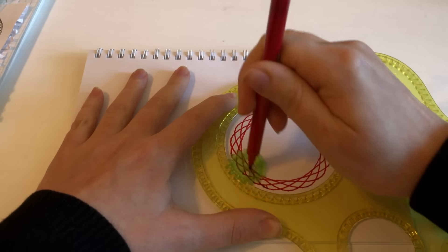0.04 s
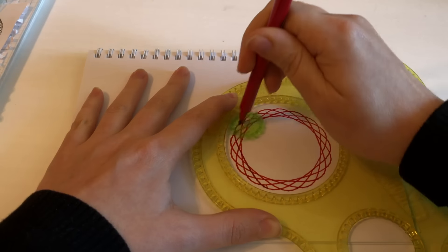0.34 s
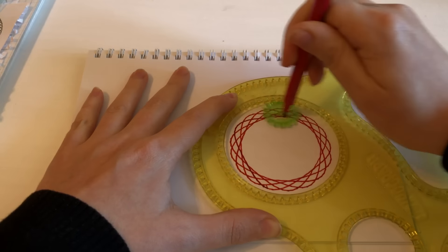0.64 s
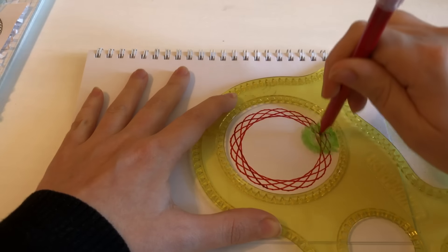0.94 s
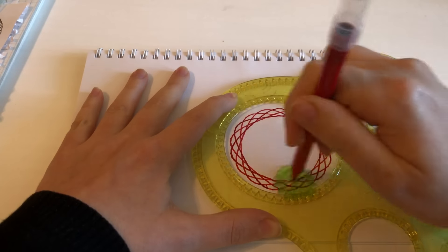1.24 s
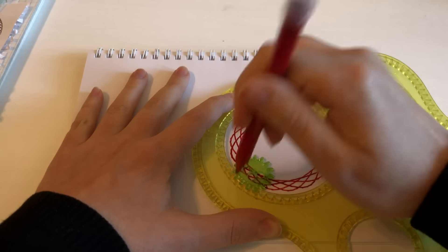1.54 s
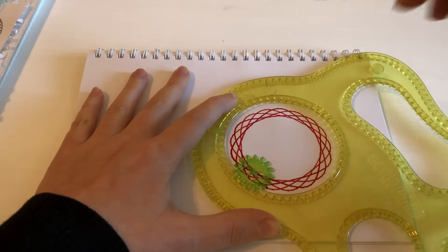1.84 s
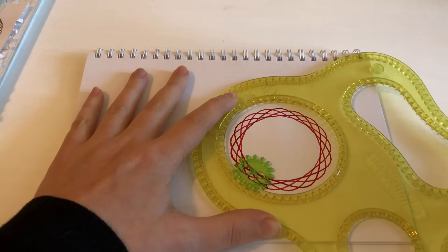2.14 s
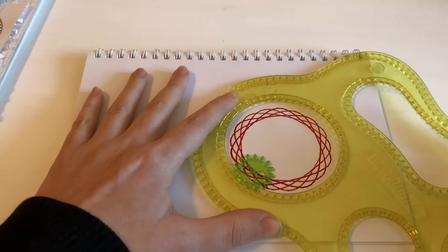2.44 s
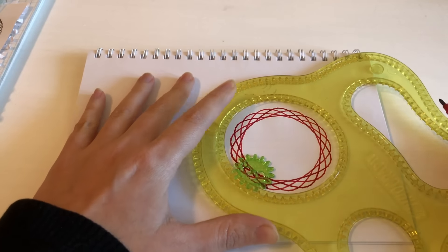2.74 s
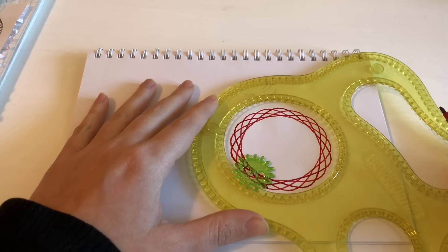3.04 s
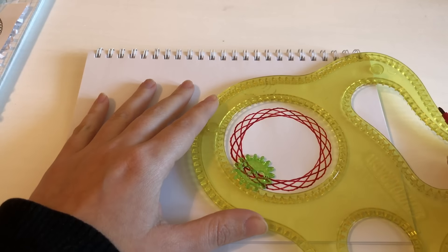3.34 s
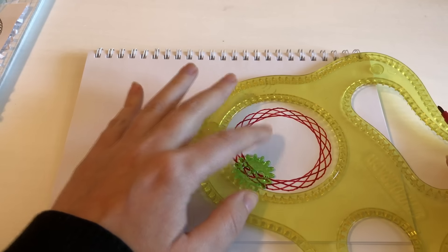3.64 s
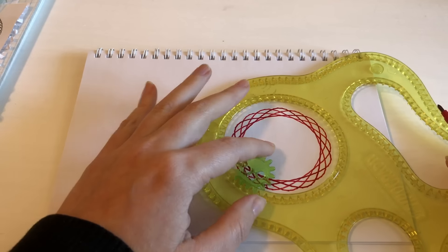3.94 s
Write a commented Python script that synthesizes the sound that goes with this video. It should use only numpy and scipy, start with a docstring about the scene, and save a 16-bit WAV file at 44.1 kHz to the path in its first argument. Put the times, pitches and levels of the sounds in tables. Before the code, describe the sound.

A pen drives a small plastic gear around a toothed template, scratching and rattling, then stops.

```python
"""A desk in a small quiet room, one microphone close to a toothed template on a paper pad.
From the start a pen drives a small plastic gear round inside it: the nib scratches harder until each
tooth drops home with a knock, and at times stalls. At 1.2 s a tooth jumps with a sharp, bright crack, and
at 1.6 s the pen rattles out. A hand rubs over the template and nudges the gear: a snap at 2.6 s, a
fingertip squeak just after, and a few light ticks near the end, over faint room tone."""
import sys
import numpy as np
from scipy import signal
from scipy.fft import rfft, irfft
from scipy.io import wavfile
from scipy.ndimage import uniform_filter1d

SR = 44100
rng = np.random.default_rng(int(sys.argv[2]) if len(sys.argv) > 2 else 0)


def dump(signal):
    """Clip the signal to [-1, 1] and save it as 16-bit WAV at the path in sys.argv[1]."""
    limited = np.clip(np.atleast_2d(signal).T, -1, 1)
    pcm = np.round(limited * 32767).astype(np.int16)
    wavfile.write(sys.argv[1], SR, pcm)


N = 176400

# room tone at the microphone: (frequency [Hz], spectral level [dB])
ROOM_SPECTRUM = [(25, -10), (60, 6), (100, -4), (200, -1.5), (600, -13), (2000, -20.5), (4000, -29.5),
                 (15000, -25.5)]
# reflections off desk and walls: (frequency [Hz], gain [dB])
ECHO_SPECTRUM = [(300, -1), (2000, 1.5), (12000, -17.5)]
# hand and sleeve rubbing: (time [s], level [dB])
RUB_LEVELS = [(1.65, -67), (2.0, -64), (2.22, -60), (2.66, -56), (2.83, -59), (3.15, -68), (3.48, -70.5),
              (3.53, -61.5), (3.59, -68), (3.73, -56.5), (3.8, -69), (4.0, -68.5)]
# colour of the rubbing: (frequency [Hz], spectral level [dB])
RUB_SPECTRUM = [(150, 2), (500, -8.5), (900, -1.5), (1600, -1.5), (2700, -3), (4000, -4.5), (6000, -9),
                (9000, -13.5), (16000, -21)]
# pen and fingers thud on the pad: (time [s], level [dB], pitch [Hz], decay [s])
THUDS = [(1.611, -47, 900, 0.018), (2.596, -48.5, 380, 0.016), (3.763, -45.5, 69, 0.039)]
# colour of thuds and desk rumble: (frequency [multiple of the pitch], spectral level [dB])
THUD_SPECTRUM = [(.3, -11.5), (1, 3), (3.5, -38.5)]
# plastic squeaking under a fingertip: (frequency [Hz], level [dB])
SQUEAK_MODES = [(1700, -57.5), (5320, -56.5)]
# template and gear pressed on the pad: (frequency [Hz], gain [dB], time to fall 60 dB [s])
PRESSED_MODES = [(762, 2.5, 0.03), (897, 4.5, 0.021), (1108, 4.5, 0.016), (1655, 2, 0.014),
                 (1902, 0, 0.014), (2537, 1.5, 0.011), (3160, 1, 0.011), (3880, 9.5, 0.0051),
                 (4650, -5, 0.014), (5500, 1, 0.011), (6060, -2.5, 0.011), (7120, -1, 0.0049)]
# the gear lying loose: (frequency [Hz], gain [dB], time to fall 60 dB [s])
LOOSE_MODES = [(815, 12, 0.026), (1720, -3, 0.037), (2590, -6.5, 0.017), (3630, -7, 0.02), (4170, 0, 0.017),
               (5330, -16.5, 0.029), (6100, -1, 0.013), (8300, -5, 0.0082)]
# nib on paper: (frequency [Hz], spectral level [dB])
NIB_SPECTRUM = [(400, -14), (1000, -7), (1600, -0.5), (2200, -11), (3800, -1.5), (4800, -3.5), (5450, 0),
                (6500, -4), (9300, -1), (10400, -4.5), (11400, -0.5), (15500, -2)]
# the nib's colour as the stroke turns: (time [s], then a gain [dB] for each of NIB_BANDS_HZ)
NIB_BAND_GAINS = [(.05, 0, 3, -7, 1, -3), (.28, 1.5, 5.5, -2.5, 5.5, -1), (.5, 6, 8, 0.5, -3.5, -9),
                  (.78, -1.5, 1.5, 5.5, 1.5, -2), (.95, 5, -1, 1, -0.5, 1), (1.17, -5, -4, -0.5, -13, 2.5),
                  (1.36, 1.5, -3.5, 4.5, -3, -3), (1.55, 11, 14.5, 2, 5.5, 2)]
# the gear sticks and the nib almost stops: (start [s], end [s])
STALLS = [(0, .02), (.098, 0.11), (0.409, 0.44), (.504, 0.54), (.891, 0.93), (.937, 1.07), (.98, 1.008),
          (1.403, 1.495), (1.44, 1.45)]
# dry crack of contact: (frequency [multiple of the blow's centre], spectral level [dB])
CRACK_SPECTRUM = [(.2, -10.5), (1, 1), (2.2, -5.5), (5, -10.5)]
# extra ring of modes at a blow's centre, as the gear goes round: (time [s], boost [dB])
CENTRE_BOOST = [(0.8, 11), (0.96, 13.5), (1.15, 3.5), (1.23, 6)]
# light ticks of the loose gear: (time [s], level [dB], centre [Hz])
GEAR_TICKS = [(2.596, -50, 1160), (3.7565, -49, 3760), (3.7995, -39.5, 4620), (3.833, -50, 2180),
              (3.9245, -56.5, 3970), (3.9515, -63, 3600)]
# bright cracks as a tooth jumps and, later, as the hand nudges: (time [s], level [dB], centre [Hz])
BRIGHT_CRACKS = [(1.224, -33, 4760), (2.595, -46.5, 4970)]
# the pen rattles out of its hole in the gear: (time [s], level [dB], centre [Hz])
PEN_LIFT = [(1.6087, -37, 1900), (1.616, -38.5, 3160), (1.622, -42, 2520)]
# each tooth drops home: (time [s], level [dB], centre [Hz], relative level of the stroke before it [dB])
TEETH = [(0.0309, -37.5, 1790, -45), (0.056, -39.5, 1790, -43), (0.0928, -45.5, 1770, -50.5),
         (0.141, -41.5, 2280, -47.5), (0.1702, -42.5, 2250, -46.5), (0.2006, -42, 2060, -44),
         (0.2298, -49, 2210.0, -45.5), (0.2589, -34, 3020, -46), (0.2805, -39.5, 3050, -41.5),
         (0.3253, -45, 3350, -41.5), (0.3526, -37, 3740, -46.5), (0.369, -33.5, 3880, -47),
         (0.4061, -43.5, 1900, -49.5), (0.4532, -36.5, 3140, -50), (0.4998, -46, 2160, -52),
         (0.5634, -43, 1594, -48.5), (0.605, -44.5, 2190, -49), (0.6409, -44, 2040, -47.5),
         (0.67, -44.5, 1740, -48.5), (0.703, -44, 2120, -46.5), (0.727, -34.5, 3500, -46.5),
         (0.7771, -39, 2650, -40.5), (0.799, -42, 2580.0, -46), (0.8179, -34, 1660, -41.5),
         (0.8374, -38, 1920, -50), (0.8579, -32.5, 2620, -44.5), (0.8855, -33.5, 2600, -50),
         (0.9317, -32.5, 2494, -43.5), (0.972, -34, 2505, -41), (1.0261, -32.5, 2515, -32.5),
         (1.056, -38.5, 1190, -41), (1.096, -42.5, 1210, -47), (1.1299, -37.5, 1150, -46.5),
         (1.1567, -32, 920, -44.5), (1.19, -42.5, 1500, -46.5), (1.224, -35.5, 2900, -42.5),
         (1.2472, -40, 2640, -41.5), (1.2598, -42, 3040, -43.5), (1.2758, -44, 2320, -49),
         (1.2972, -45.5, 3230, -45), (1.332, -45.5, 2970, -44.5), (1.362, -38.5, 2720, -46),
         (1.389, -40.5, 3460, -52), (1.4344, -43.5, 3130, -38.5), (1.4809, -40, 2920, -37),
         (1.5128, -40, 3140, -56.5), (1.54, -36, 2860, -60), (1.558, -41, 2170, -62.5)]

ROOM_DB, HUM_HZ, HUM_DB, WHINE_HZ = -62.5, 61.8, -71.5, 997
ECHO_DB, ECHO_T60_S, ECHO_DELAY_S = -18, 0.24, 0.0058
DESK_DB, DESK_HZ = -62.5, 81
SQUEAK_AT_S, SQUEAK_SWELL_S = 2.682, 0.017
GRAINS_PER_S, GRAIN_SPREAD_DB = 6000, 2.5
NIB_BANDS_HZ = (2260, 4570, 5380, 7000, 12200)
NIB_GAIN_DB, NIB_FLUTTER_DB, NIB_DIRECT_DB, MODE_WANDER_DB = 2, 3, 9, 3
BUILD_DB_PER_S, SPURT_DB, SPURT_S, STALL_DB, STALL_EDGE_S = 202, 4, 0.01, -14.5, 0.0045
CONTACT_OCTAVES, BOOST_OCTAVES = 1, 0.051  # spread of a blow's spectrum; reach of the centre boost
BEND_LAG_S, RING_RISE_S, CRACK_DECAY_S = 0.000903, 0.0002, 0.0027  # the lag holds at 1 kHz
LOW_CUT_HZ, HIGH_CUT_HZ = 37.4, 15800


def undb(db):
    """Decibels to gain."""
    return 10 ** (np.asarray(db) / 20)


def unit(x):
    """Scale to rms 1."""
    return x / np.sqrt(np.mean(x ** 2))


def curve(rows, column=1):
    """Join the rows of a table by straight lines in time."""
    rows = np.array(rows)
    return np.interp(np.arange(N) / SR, rows[:, 0], rows[:, column])


def colour(x, points):
    """Filter by a spectrum of (frequency [Hz], gain [dB]) points."""
    hz, db = np.array(points).T
    f = np.maximum(np.fft.rfftfreq(len(x), 1 / SR), 1)
    return irfft(rfft(x) * undb(np.interp(np.log(f), np.log(hz), db)), len(x))


def noise(points, pitch=1, samples=N):
    """Coloured noise of rms 1; pitch multiplies the spectrum's frequencies."""
    return unit(colour(rng.standard_normal(samples), np.array(points) * [pitch, 1]))


def wander(per_s):
    """Smooth random drift of rms 1."""
    span = int(SR / per_s)
    return unit(uniform_filter1d(uniform_filter1d(rng.standard_normal(N), span), span))


def grains():
    """Friction as dense tiny clicks of uneven size."""
    clicks = (rng.random(N) < GRAINS_PER_S / SR) * rng.choice([-1, 1], N)
    return clicks * undb(GRAIN_SPREAD_DB * rng.standard_normal(N))


def resonate(x, hz, width_hz):
    """Ring one resonance, gain 1 at its centre."""
    return signal.lfilter(*signal.iirpeak(hz, hz / width_hz, fs=SR), x)


def room_tone():
    """The room behind the desk: soft noise, a wavering low hum and a faint electrical whine."""
    t = np.arange(N) / SR
    hum = unit(np.sin(2 * np.pi * HUM_HZ * t + wander(27)) * undb(6.4 * np.tanh(wander(3.7))))
    whine = sum(np.sin(2 * np.pi * (k * WHINE_HZ * t + rng.random())) * undb(-78 - .5 * k)
                for k in range(3, 16))
    return undb(ROOM_DB) * noise(ROOM_SPECTRUM) + undb(HUM_DB) * hum + whine


def reflections(x):
    """Desk and walls return a short tail that reaches the microphone just after the direct sound."""
    t = np.arange(N // 8) / SR
    decay = (t > ECHO_DELAY_S) * np.exp(-np.log(1000) * t / ECHO_T60_S)
    tail = colour(rng.standard_normal(len(t)), ECHO_SPECTRUM) * decay
    return undb(ECHO_DB) * signal.fftconvolve(x, tail / np.sqrt(np.sum(tail ** 2)))[:N]


def desk_rumble():
    """The desk rumbles under the moving pen until it is lifted."""
    moving = np.clip((PEN_LIFT[-1][0] - np.arange(N) / SR) / 0.017, 0, 1)
    return undb(DESK_DB) * noise(THUD_SPECTRUM, DESK_HZ) * moving


def hand():
    """Skin and sleeve rub over the template; pen and fingers thud softly on the pad."""
    out = noise(RUB_SPECTRUM) * undb(curve(RUB_LEVELS))
    for start, db, hz, decay_s in THUDS:
        age = np.maximum(np.arange(N) / SR - start, 0)
        envelope = np.minimum(age / 0.001, 1) * np.exp(-age / decay_s)
        out += undb(db) * noise(THUD_SPECTRUM, hz) * envelope
    return out


def squeak():
    """A fingertip sticks and slips for a moment and sets the plastic singing."""
    swell = np.exp(-((np.arange(N) / SR - SQUEAK_AT_S) / SQUEAK_SWELL_S) ** 2)
    slips = grains()
    return swell * sum(undb(db) * unit(resonate(slips, hz, width_hz=250)) for hz, db in SQUEAK_MODES)


def template_ring(scratch):
    """The direct scratch plus the template's resonances, whose shares shift as the nib travels."""
    modes = [(hz, np.log(1000) / (np.pi * t60)) for hz, _, t60 in PRESSED_MODES]
    modes += [(8010 + k * 1002, 320) for k in range(8)]  # high modes: (frequency [Hz], width [Hz])
    ring = sum(resonate(scratch, hz, width) * undb(MODE_WANDER_DB * wander(14.2)) for hz, width in modes)
    return undb(NIB_DIRECT_DB) * scratch + ring


def stroke():
    """Strength of the nib's stroke: it builds to each tooth, spurts just before it and sometimes stalls."""
    t = np.arange(N) / SR
    drops, _, _, level_db = np.array(TEETH).T
    tooth = np.minimum(np.searchsorted(drops, t), len(drops) - 1)
    gap_s = np.abs(drops[tooth] - t)
    db = level_db[tooth] - BUILD_DB_PER_S * gap_s + SPURT_DB * np.exp(-(gap_s / SPURT_S) ** 2)
    stuck = sum(1. * ((t >= start) & (t < end)) for start, end in STALLS)  # overlaps stall deeper
    stuck = uniform_filter1d(stuck, int(STALL_EDGE_S * SR))
    fade_in = np.minimum(t / STALLS[0][1], 1) ** 2
    fade_out = np.exp(-np.maximum(t - drops[-1], 0) / 0.057)
    return uniform_filter1d(undb(db + STALL_DB * stuck) * fade_in * fade_out, size=70)


def nib():
    """Paper fibres flick the nib and ring the plastic; the colour turns with the stroke."""
    spectrum = rfft(unit(template_ring(colour(grains(), NIB_SPECTRUM))))
    log_hz = np.log(np.maximum(np.fft.rfftfreq(N, 1 / SR), 1))
    scratch = np.zeros(N)
    for column, pick in enumerate(np.eye(len(NIB_BANDS_HZ)), start=1):
        band = irfft(spectrum * np.interp(log_hz, np.log(NIB_BANDS_HZ), pick), N)
        scratch += band * undb(curve(NIB_BAND_GAINS, column))
    return scratch * stroke() * undb(NIB_GAIN_DB + NIB_FLUTTER_DB * np.tanh(wander(140)))


def knocks(blows, modes, crack_db):
    """Each blow on the plastic cracks and rings the modes near its centre; low bending waves arrive last."""
    out, t = np.zeros(N), np.arange(N // 50) / SR
    hz, db, t60 = np.array(modes).T[:, :, None]
    age = np.maximum(t - BEND_LAG_S * np.sqrt(1000 / hz), 0)
    envelope = (1 - np.exp(-age / RING_RISE_S)) * np.exp(-np.log(1000) * age / t60)
    for start, level_db, centre_hz in np.array(blows)[:, :3]:
        phase, detune, scatter_db = rng.standard_normal((3, len(hz), 1))
        octaves = np.log2(hz / centre_hz)
        boost_db = np.interp(start, *np.array(CENTRE_BOOST).T) * np.exp(-(octaves / BOOST_OCTAVES) ** 2)
        gain = undb(db + scatter_db + boost_db) * np.exp(-.5 * (octaves / CONTACT_OCTAVES) ** 2)
        swing = np.sin(2 * np.pi * (hz * (1 + .01 * detune) * age + phase))
        ring = (gain * swing * envelope).sum(0)
        ring /= np.sqrt(np.mean(ring[:SR // 200] ** 2))  # rms 1 over the first 5 ms
        crack = noise(CRACK_SPECTRUM, centre_hz, len(t)) * np.exp(-t / CRACK_DECAY_S)
        knock = undb(level_db) * (ring + undb(crack_db) * crack)
        i = int(start * SR)
        out[i:i + len(t)] += knock[:N - i]
    return out


def scene():
    """Pen, gear and hand close to the microphone, with the room behind them, in mono."""
    teeth = knocks(TEETH, PRESSED_MODES, crack_db=3)
    pen_lift = knocks(PEN_LIFT, PRESSED_MODES, crack_db=3)
    cracks = knocks(BRIGHT_CRACKS, PRESSED_MODES, crack_db=4)
    ticks = knocks(GEAR_TICKS, LOOSE_MODES, crack_db=-1)
    close = teeth + pen_lift + cracks + ticks + nib() + hand() + desk_rumble() + squeak()
    return (close + reflections(close) + room_tone())[None]


def record(dry):
    """The recorder thins the deep bass and cuts off the top."""
    low_cut = signal.butter(2, LOW_CUT_HZ, "high", fs=SR, output="sos")
    high_cut = signal.ellip(12, .1, 80, HIGH_CUT_HZ, fs=SR, output="sos")
    return signal.sosfilt(high_cut, signal.sosfilt(low_cut, dry))


dry = scene()
out = record(dry)
dump(out)
```